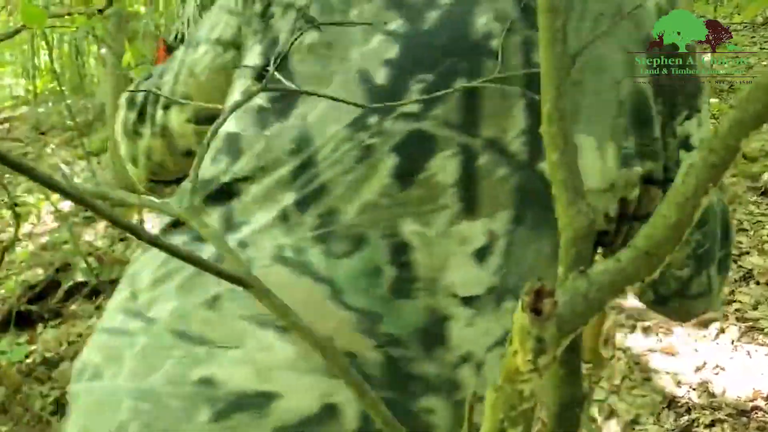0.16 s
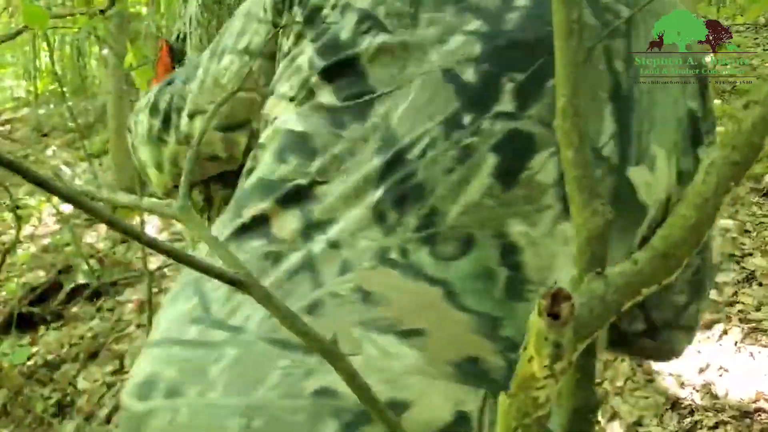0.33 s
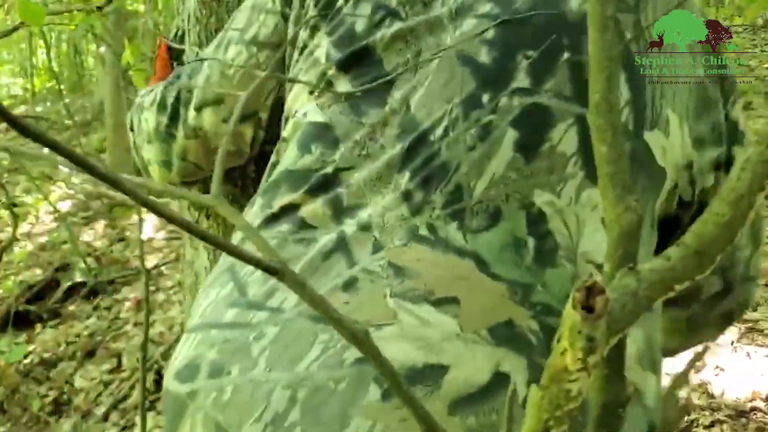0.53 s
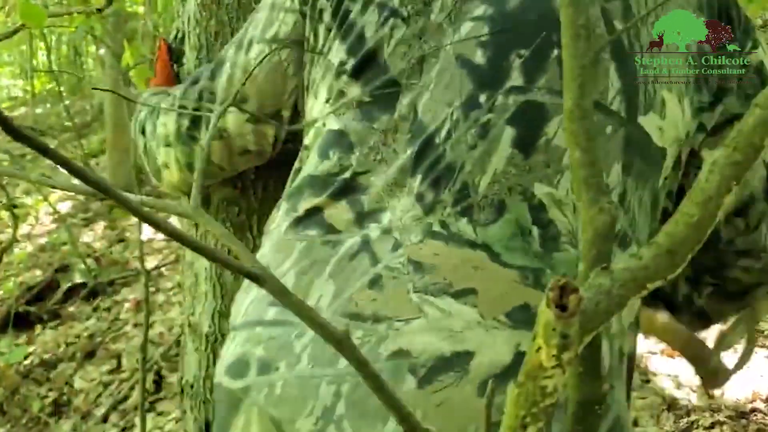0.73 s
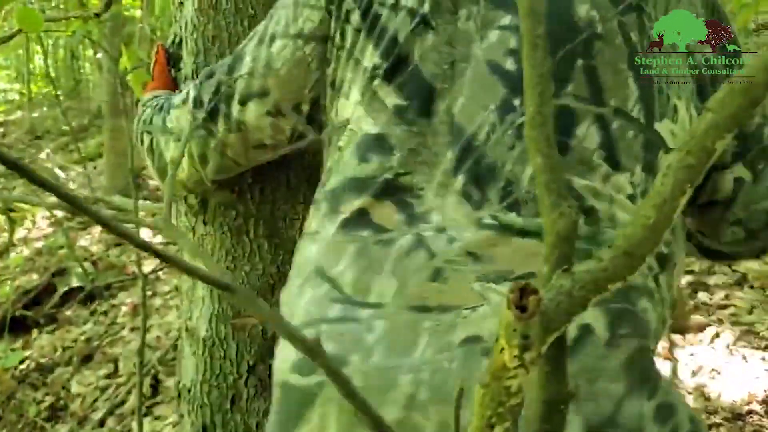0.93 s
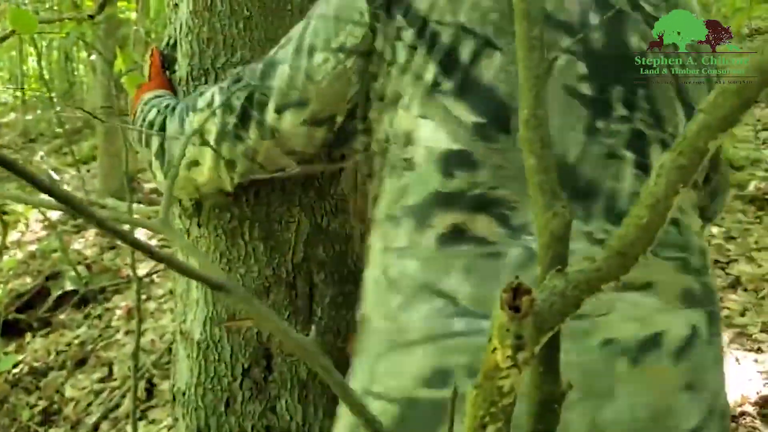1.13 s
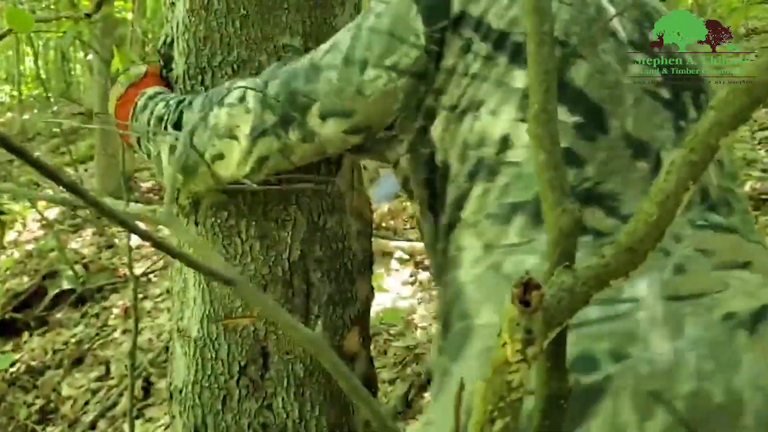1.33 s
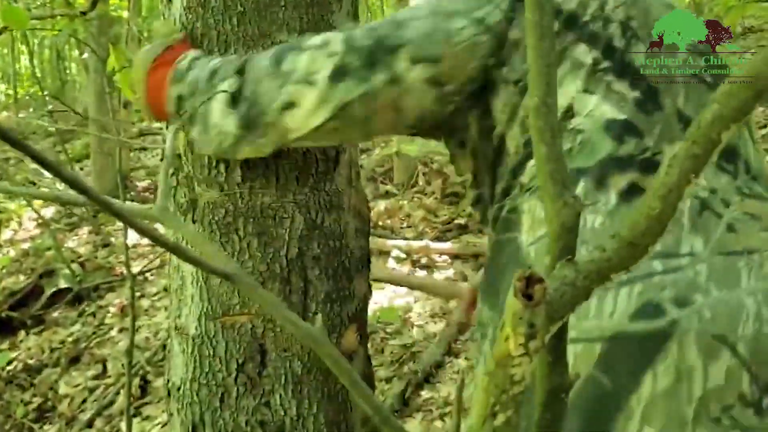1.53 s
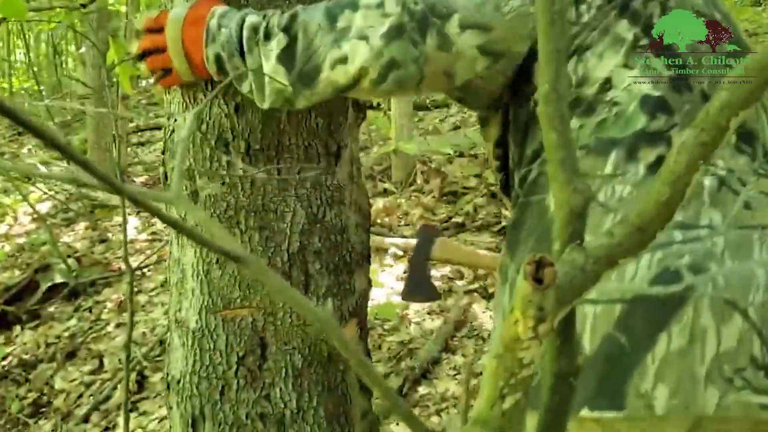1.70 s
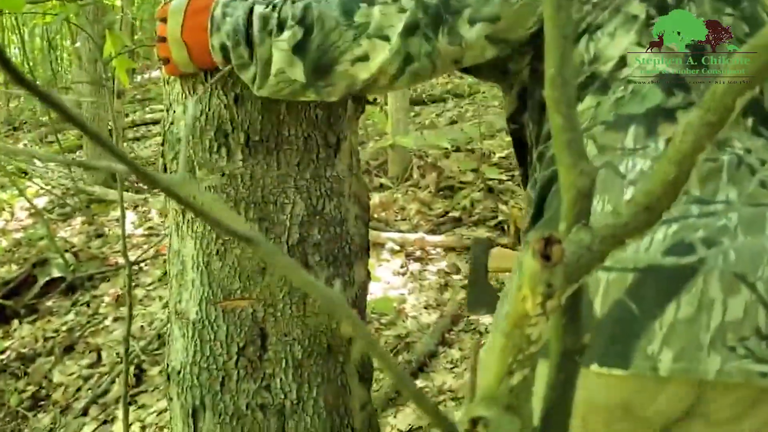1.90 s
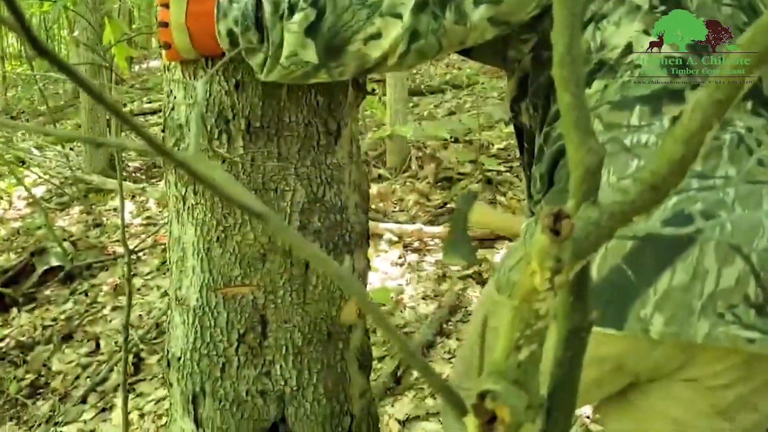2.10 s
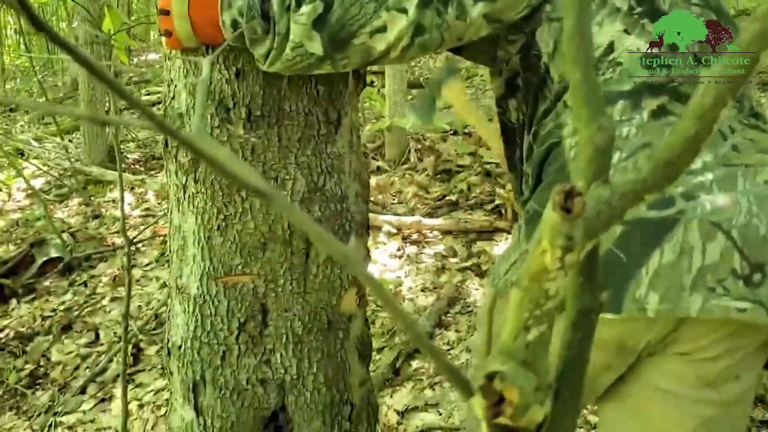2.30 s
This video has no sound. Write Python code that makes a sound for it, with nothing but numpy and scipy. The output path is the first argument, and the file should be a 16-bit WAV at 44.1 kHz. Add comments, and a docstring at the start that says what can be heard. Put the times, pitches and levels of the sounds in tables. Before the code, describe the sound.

Two sharp hatchet chops in bark, close by, amid rustling leaf litter and snapping twigs

```python
"""Chopping into a tree in the woods

A hatchet bites twice into bark, close by: noise bursts split, damped modes thud in the trunk and ring in the steel.
Around the chops the woodsman shifts his feet in dry leaves, made of grains of noise; twigs snap as short
bursts and buried sticks knock under his boots as damped modes. The woods answer the hits faintly with a
diffuse noise tail, and the chops overload the microphone, which rounds off the peaks."""
import sys
import numpy as np
from scipy import signal
from scipy.fft import rfft, irfft, next_fast_len
from scipy.io import wavfile
from scipy.ndimage import uniform_filter1d, map_coordinates

SR = 44100
rng = np.random.default_rng(int(sys.argv[2]) if len(sys.argv) > 2 else 0)


def write(x):
    x = np.atleast_2d(x).T
    wavfile.write(sys.argv[1], SR, np.round(np.clip(x, -1, 1) * 32767).astype(np.int16))


N = 103635  # length in samples
TOP_HZ = 15800  # band limit of the microphone

# colour of deep sound in the ground: f/Hz, level/dB per Hz
GROUND_COLOUR = [(20, -11), (38, -18), (58, 2.5), (80, -1.5), (120, -13), (220, -5), (600, -39)]


def amp(db):
    """Decibels to gain."""
    return 10 ** (np.asarray(db) / 20)


def unit(x):
    """Scaled to rms 1."""
    return x / np.sqrt(np.mean(x ** 2) + 1e-20)


def along(points, hz):
    """Read a curve of (Hz, value) points on a log frequency axis."""
    f, v = np.transpose(points)
    return np.interp(np.log(hz + 1), np.log(f + 1), v)


def filtered(x, response):
    """Multiply the spectrum of x by a response of frequency."""
    n = x.shape[-1]
    padded = next_fast_len(n + SR // 4)
    spectrum = rfft(x, padded) * response(np.fft.rfftfreq(padded, 1 / SR))
    return irfft(spectrum, padded)[..., :n]


def add(out, s, sound):
    """Mix a sound in at time s, cut at the end of the scene."""
    part = out[:, round(s * SR):][:, :sound.shape[-1]]
    part += sound[..., :part.shape[1]]


def spread(pair, colour):
    """Turn two unrelated signals into coloured stereo, alike in the bass, with a mid of rms 1."""
    # stereo likeness: f/Hz, left-right correlation
    alike = [(60, 0.95), (300, 0.95), (640, 0.87), (1400, 0.47), (3100, 0.1), (6800, 0), (15000, 0.23)]

    def mid_side_gains(hz):
        turn = np.arccos(np.clip(along(alike, hz), -1, 1)) / 2
        return amp(along(colour, hz)) * np.array([np.cos(turn), np.sin(turn)])

    mid, side = filtered(pair, mid_side_gains)
    return np.array([mid + side, mid - side]) / np.std(mid)


def noise(colour, size):
    """Coloured stereo noise with a mid of rms 1."""
    return spread(rng.standard_normal((2, size)), colour)


def fade(t, t60, hold=0):
    """Hold, then die away by 60 dB in t60 seconds."""
    return np.exp(-np.log(1000) * np.maximum(t - hold, 0) / t60)


def ring(modes, t, hold=0):
    """Sum damped sine modes, held at first; each mode's level varies a little by chance."""
    total = 0
    for hz, db, t60 in modes:
        gain = amp(db + rng.normal(0, 1))
        total = total + gain * fade(t, t60, hold) * np.sin(2 * np.pi * hz * t)
    return total


def wobble(rate):
    """A smooth random curve with the given number of knots a second."""
    knots = rng.standard_normal(int(N * rate / SR) + 4)
    return map_coordinates(knots, [np.arange(N) * rate / SR])


def crackle(colour, rate=800, spread_db=2.5, life=0.0011, smooth=0.4):
    """Tiny leaf fractures (rate per s, life in s) of uneven size over a smooth share of rubbing power."""
    sizes = amp(spread_db * np.minimum(rng.exponential(size=N), 3.5))
    breaks = (rng.random(N) < rate / SR) * sizes ** 2
    decay = np.exp(-np.arange(SR // 50) / SR / life)
    power = np.abs(signal.fftconvolve(breaks, decay)[:N])
    envelope = np.sqrt(smooth + (1 - smooth) * power / power.mean())
    return spread(rng.standard_normal((2, N)) * envelope, colour)


def patchy(x):
    """Each bunch of leaves colours the rustle for a moment: a smoothed random gain over time and frequency."""
    patchy_db = 2.0  # rms swing
    z = signal.stft(x, nperseg=512)[2]
    field = rng.standard_normal(z.shape[1:])
    field = uniform_filter1d(field, size=5, axis=0)  # across frequency
    field = uniform_filter1d(field, size=4, axis=1)  # across time
    return signal.istft(z * unit(amp(patchy_db * unit(field))), nperseg=512)[1][:, :N]


def leaves():
    """Boots stir leaf litter: grains of crunch, fizz, single ticks and soft tread over a noise rumble of the ground."""
    # stirring, in spans between the hits, read together as one curve: t/s, crunch level/dB, treble level/dB,
    # bass level/dB
    stirs = [
        [(0.0, -41.5, -35.5, -50), (0.094, -39, -44, -47), (0.138, -38, -36, -51), (0.152, -32.5, -33, -40),
         (0.17, -41.5, -38, -50), (0.214, -30.5, -34.5, -38), (0.242, -38, -35.5, -47),
         (0.268, -36.5, -40, -37.5), (0.308, -35.5, -38, -49), (0.42, -31, -27.5, -42),
         (0.426, -31.5, -32, -35), (0.46, -41.5, -42, -45.5)],
        [(0.475, -38, -38, -47), (0.521, -35, -30, -53), (0.54, -31.5, -31, -41)],
        [(0.625, -38.5, -36, -53), (0.671, -31, -32.5, -53), (0.755, -41, -33.5, -61), (0.763, -42.5, -47, -51),
         (0.841, -52, -51, -73), (0.973, -54.5, -57, -63), (1.043, -56.5, -53, -61), (1.079, -46.5, -64, -61),
         (1.085, -55, -54, -59), (1.141, -54, -59, -60), (1.165, -58, -52, -73)],
        [(1.17, -48.5, -52, -62), (1.2, -22.5, -26.5, -31), (1.218, -23.5, -23, -46),
         (1.258, -32, -27.5, -32.5), (1.284, -30, -32, -47), (1.302, -32.5, -32, -45),
         (1.324, -39, -37.5, -50.5), (1.4, -36, -36.5, -48.5)],
        [(1.435, -33, -33, -39), (1.489, -34, -33, -51), (1.52, -33.5, -33, -42)],
        [(1.59, -34.5, -33.5, -53), (1.622, -35.5, -34, -48.5), (1.738, -36, -36, -47.5),
         (1.75, -32.5, -37.5, -46), (1.784, -34.5, -33, -47.5), (1.88, -32.5, -33, -38.5),
         (1.932, -28, -26.5, -38.5), (2.034, -28.5, -29, -45), (2.05, -36, -37.5, -50)],
        [(2.085, -36, -32, -39), (2.165, -47.5, -53, -60.5), (2.211, -40.5, -43, -54), (2.215, -42.5, -45, -68),
         (2.233, -37, -35, -49), (2.269, -44, -49, -61), (2.289, -55, -57, -56), (2.325, -61, -58, -77),
         (2.337, -43, -44, -58), (2.35, -34, -43, -50)],
    ]
    # colours of crunch, fizz, tread and single ticks: f/Hz, level/dB per Hz
    crunch_colour = [(300, -43), (600, -8), (1000, -6.5), (1500, -0.5), (2000, 0), (2900, -4), (4200, -5),
                     (5200, -3), (6600, -2.5), (8000, -11.5), (12000, -33)]
    fizz_colour = [(4000, -3), (7400, -1.5), (9000, -0.5), (11200, -1.5), (13000, 6), (14500, 6.5),
                   (15800, -1.5)]
    tread_colour = [(50, -40), (120, -7.5), (220, 0), (330, 1), (550, -1), (900, -14.5), (2000, -12)]
    tick_colour = [(400, -20), (1000, -1), (1800, 4), (4000, -11.5), (8000, -6.5), (14000, -6.5),
                   (15800, -3.5)]
    crunch_db, fizz_db, tread_db = -2, -1, -0.5  # trims on the table levels
    flutter_per_s, flutter_db = 90, 0.57  # leaves give way in clumps

    s, *levels = np.vstack(stirs).T
    clumps = flutter_db * wobble(flutter_per_s)
    crunch, fizz, tread = [amp(np.interp(np.arange(N) / SR, s, db) + clumps) for db in levels]

    crunching = crunch * amp(crunch_db) * crackle(crunch_colour)
    fizzing = fizz * amp(fizz_db) * crackle(fizz_colour)
    rustle = patchy(crunching + fizzing)

    # ticks sit at -46 dB when the treble is at -35 dB, and follow only a share of its swings
    tick_level = amp(-46) * (fizz / amp(-35)) ** 0.49
    ticks = tick_level * crackle(tick_colour, rate=70, spread_db=1, life=0.00033, smooth=0)

    treading = tread * amp(tread_db) * crackle(tread_colour)

    # the rumble swings less than the tread, around this tread level
    rest_db, ground_db, ground_follows = -51, -8.5, 0.64
    rumble_level = amp(rest_db + ground_db) * (tread / amp(rest_db)) ** ground_follows
    rumble = rumble_level * noise(GROUND_COLOUR, N)
    return rustle + ticks + treading + rumble


def air():
    """The quiet of the woods: steady coloured noise."""
    # colour: f/Hz, level/dB per Hz
    air_colour = [(18, -42), (30, -5), (71, -2), (656, -10), (709, -1), (897, -13), (1590, -8), (3230, -4),
                  (4420, -8), (15500, -12)]
    return amp(-57.5) * noise(air_colour, N)


def twigs():
    """Twigs and leaf stems snap: each is a short noise burst around its own pitch."""
    # snaps: t/s, level/dB, centre f/Hz, t60/s
    snaps = [(.044, -29, 9000, 0.0026), (.150, -26.5, 3020, 0.018), (.332, -33, 4970, .01),
             (0.4148, -21, 8550, 0.022), (.509, -22, 9050, 0.0087), (.533, -25, 1670, 0.013),
             (0.7129, -19.5, 10000, 0.025), (0.7315, -20, 3400, 0.012), (0.749, -24, 2930, 0.014),
             (.783, -33, 2500, 0.0093), (.804, -36, 4000, .01), (1.063, -36, 11100, .007),
             (1.077, -37, 7000, .007), (1.1545, -33.5, 12000, .008), (1.179, -37, 3950, 0.021),
             (1.2047, -18, 5000, .008), (1.2352, -15.5, 11000, 0.0056), (1.299, -29, 9000, 0.0064),
             (1.344, -27.5, 11000, 0.0052), (1.4174, -19, 5270, 0.0049), (1.446, -26.5, 4000, 0.0085),
             (1.528, -23, 2500, .005), (1.564, -13, 12800, .004), (1.629, -23.5, 2900, .01),
             (1.677, -23, 13000, .003), (1.772, -25.5, 7000, 0.0064), (1.810, -23, 11000, 0.0039),
             (2.0307, -20, 4000, 0.0035), (2.0668, -19, 8250, 0.0087), (2.119, -28.5, 2250, 0.0061),
             (2.2066, -27.5, 12000, 0.012), (2.238, -46, 3970, 0.0088), (2.338, -34.5, 2360, 0.013)]
    half_width_octaves = 0.7  # 6 dB down this far from the centre
    out, t = np.zeros((2, N)), np.arange(SR // 20) / SR
    grid = np.geomspace(100, TOP_HZ, 24)
    for s, db, hz, t60 in snaps:
        offset = np.log2(grid / hz) / half_width_octaves
        colour = np.column_stack([grid, -20 * np.log10(1 + offset ** 2)])
        add(out, s, amp(db) * noise(colour, len(t)) * fade(t, t60))
    return out


def sticks():
    """A stick clacks in damped modes and pushes into the soil, which thumps and booms softly."""
    # sticks pressed underfoot: t/s, clack level/dB, thump level/dB, thump f/Hz, soil boom level/dB
    knocks = [(0.5466, -24, -21, 191, -46), (0.6625, -35, -44, 300, -50), (0.7505, -32, -41, 384, -49),
              (1.063, -37, -59, 400, -75), (1.0766, -31.5, -57, 400, -71), (1.2003, -16.5, -33, 199, -37),
              (1.2353, -16.5, -21, 234, -40), (1.3000, -20, -21, 290, -42.5),
              (1.418, -14.5, -14, 254, -37.5), (1.7519, -26, -26.5, 302, -47),
              (2.0664, -15.5, -20.5, 310, -58)]
    # modes of a stick: f/Hz, level/dB, t60/s
    stick_modes = [(670, -18.5, 0.004), (1170, -12.5, .014), (1257, 1.5, 0.0087), (1540, -1.5, 0.0064),
                   (2060, 7.5, 0.0027)]
    attack_s, thump_t60, soil_t60 = 0.00032, 0.022, 0.22
    out, t = np.zeros((2, N)), np.arange(SR // 4) / SR
    rise = 1 - np.exp(-t / attack_s)
    for s, clack_db, thump_db, hz, soil_db in knocks:
        clack = amp(clack_db) * ring(stick_modes, t)
        thump = amp(thump_db) * ring([(hz, 0, thump_t60)], t)
        soil = amp(soil_db) * noise(GROUND_COLOUR, len(t)) * fade(t, soil_t60)
        add(out, s, rise * (clack - thump + soil))  # the thump starts in the opposite direction
    return out


def steel(t):
    """The blade rubs in the cut, so the phases of its damped modes wander and each line widens."""
    # modes of the blade: f/Hz, level/dB, t60/s
    blade_modes = [(2400, -16, .17), (3780, -13, .13), (4984, 0, 0.23), (5220, 0, .22), (5700, -7, .15),
                   (5435, -5, .14), (6110, -10, .11), (9540, -12, .11)]
    blur_hz = 14
    step = np.sqrt(2 * np.pi * blur_hz / SR)
    total = 0
    for hz, db, t60 in blade_modes:
        wander = step * np.cumsum(rng.standard_normal(len(t)))
        total = total + amp(db) * fade(t, t60) * np.sin(2 * np.pi * hz * t + wander)
    return total


def trunk(t):
    """The struck trunk thuds in low damped modes, with a boom of deep noise."""
    # modes of the trunk: f/Hz, level/dB, t60/s
    trunk_modes = [(60, -8.5, 0.15), (131, -0.5, 0.053), (180, -1.5, 0.043), (260, -3, 0.039)]
    boom_db, boom_t60 = -18.5, 0.47
    boom = amp(boom_db) * noise(GROUND_COLOUR, len(t)) * fade(t, boom_t60)
    return ring(trunk_modes, t) + boom


def chops():
    """Fibres split while the blade sinks in, as steel rings and bark crumbles; the trunk thuds just after."""
    # chops: t/s, bite length/s, crack level/dB, wood ring level/dB, steel level/dB, thud level/dB, crumbs level/dB
    chop_table = [(0.5575, 0.0055, -9.5, -9, -23, -15, -18.5),
                  (1.5362, 0.002, -11.5, -4.5, -47, -16, -21.5)]
    # colour of the crack, one table per chop: f/Hz, level/dB per Hz
    crack_colours = [
        [(100, -12), (200, 0), (400, 0), (800, -0.5), (1350, 3), (1800, -3), (2200, -13), (3000, -1.5),
         (4300, -13), (5100, 2.5), (6200, -9), (7800, -25), (10000, -9.5), (12000, -19), (15500, -9.5)],
        [(100, -20), (200, -7), (600, -7), (1600, -3.5), (2250, -4), (3400, 1), (4500, -27), (5700, -3),
         (7800, -38), (12000, -29), (15500, -18)],
    ]
    # modes of the wood at the cut, one table per chop: f/Hz, level/dB, t60/s
    wood_modes = [
        [(887, -10.5, 0.012), (1247, -0.5, 0.013), (1445, -11, 0.011), (1617, -9.5, 0.011), (2958, -5, .018),
         (3150, -20, .025)],
        [(600, -13.5, 0.014), (1030, -11.5, 0.034), (1570, -16, 0.022), (2168, 1.5, 0.017), (2487, -8.5, 0.035),
         (2870, -6, 0.015), (3260, -15, 0.011)],
    ]
    # colour of the bark crumbs: f/Hz, level/dB per Hz
    crumbs_colour = [(100, -4), (250, 3), (700, -12), (1500, -3), (3000, 8), (4200, -3.5), (5500, -0.5),
                     (8000, -4.5), (15500, -9.5)]
    attack_s, crack_t60, crumbs_t60, thud_delay_s = 0.0014, 0.031, 0.17, 0.00463

    out, t = np.zeros((2, N)), np.arange(SR // 2) / SR
    rise = 1 - np.exp(-t / attack_s)
    for chop, crack_colour, modes in zip(chop_table, crack_colours, wood_modes):
        s, bite, crack_db, wood_db, steel_db, thud_db, crumbs_db = chop
        crack = amp(crack_db) * noise(crack_colour, len(t)) * fade(t, crack_t60, bite)
        wood = amp(wood_db) * ring(modes, t, bite)
        crumbs = amp(crumbs_db) * noise(crumbs_colour, len(t)) * fade(t, crumbs_t60, bite)
        add(out, s, rise * (crack + wood + crumbs + amp(steel_db) * steel(t)))
        add(out, s + thud_delay_s, amp(thud_db) * rise * trunk(t))
    return out


def forest(x):
    """The diffuse answer of the trunks around: a noise tail whose decay time varies with frequency."""
    # decay of the woods: f/Hz, t60/s
    woods_t60 = [(100, 0.48), (1000, 0.63), (4000, 1), (14000, 0.43)]
    hz, t, z = signal.stft(rng.standard_normal((2, SR)), SR, nperseg=256)
    decay = fade(t, along(woods_t60, hz)[:, None])
    tail = signal.istft(z * decay, SR, nperseg=256)[1]
    return signal.fftconvolve(x, tail / np.linalg.norm(tail[0]), axes=1)[:, :N]


def lean(x, share=1):
    """Sounds from the right are shaded at the left microphone port, most in the upper treble."""
    # stereo balance: f/Hz, right over left level/dB
    balance = [(60, .3), (300, .6), (640, 3.3), (1400, 8.3), (3100, 3), (5000, 1.2), (7000, 4.5),
               (10000, 8.3), (15000, 9.7)]
    sides = np.array([[-.5], [.5]])  # left, right
    return filtered(x, lambda hz: amp(share * along(balance, hz) * sides))


def scene():
    """Chops and footwork, a little to the right, over the quiet of the woods."""
    hits = lean(chops(), share=0.75) + lean(sticks() + twigs())
    bed = lean(leaves() + air())
    echo = amp(-21.5) * forest(hits)
    return hits + bed + echo


def record(dry):
    """The microphone sheds the deepest bass, clips softly near full scale and stops at its band limit."""
    low_cut_hz, clip_top = 53, 1.0
    low_cut = signal.butter(3, low_cut_hz, "highpass", fs=SR, output="sos")
    dry = signal.sosfilt(low_cut, dry)
    clipped = dry / (1 + np.abs(dry / clip_top) ** 8) ** (1 / 8)
    return filtered(clipped, lambda hz: hz < TOP_HZ)


dry = scene()
out = record(dry)
write(out)
```